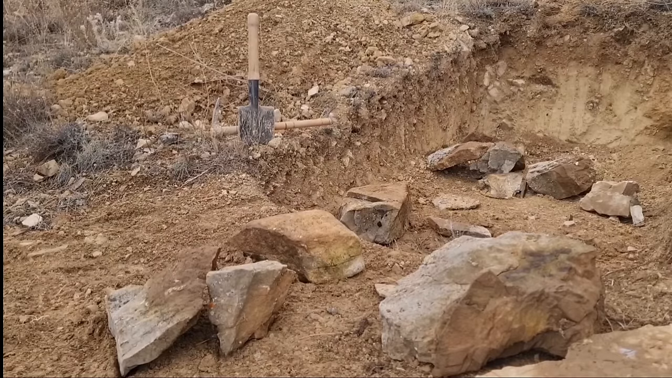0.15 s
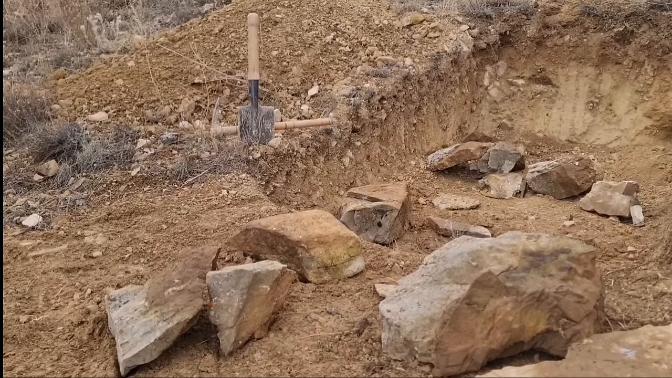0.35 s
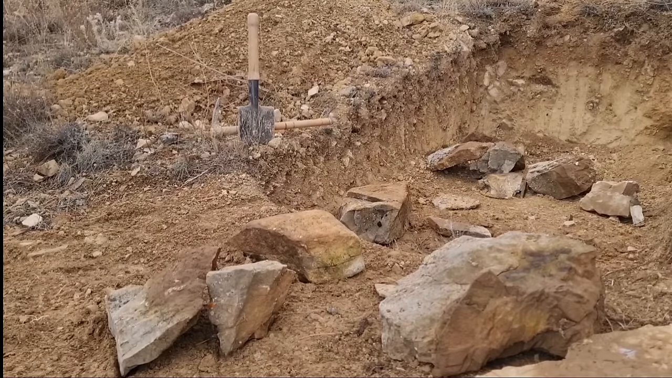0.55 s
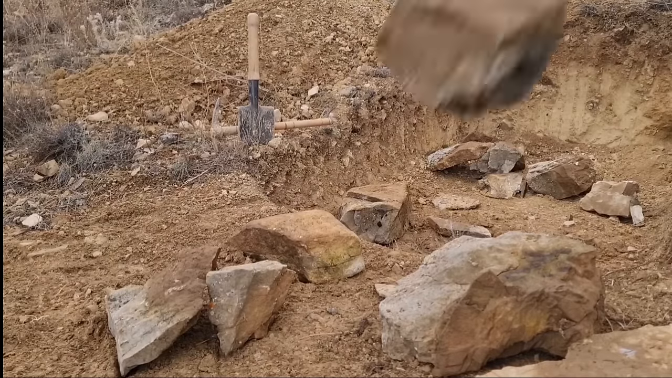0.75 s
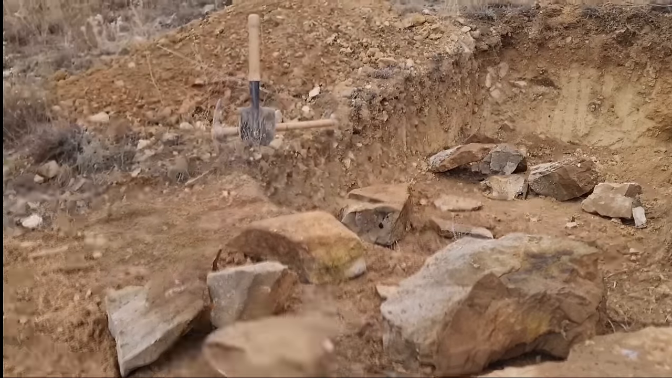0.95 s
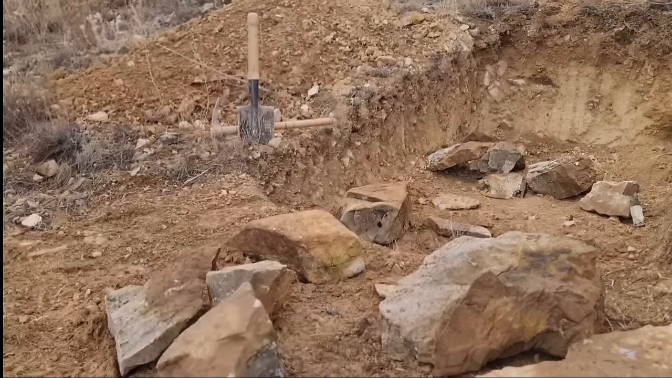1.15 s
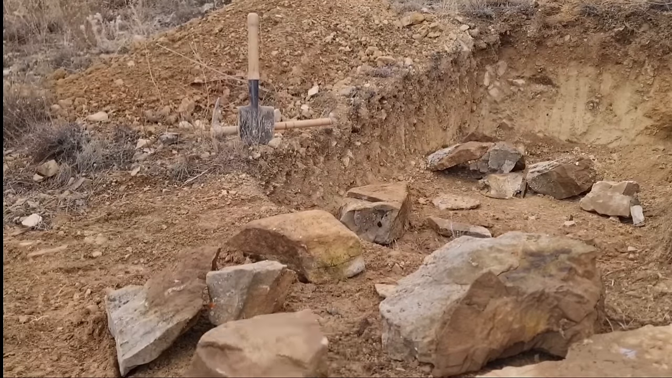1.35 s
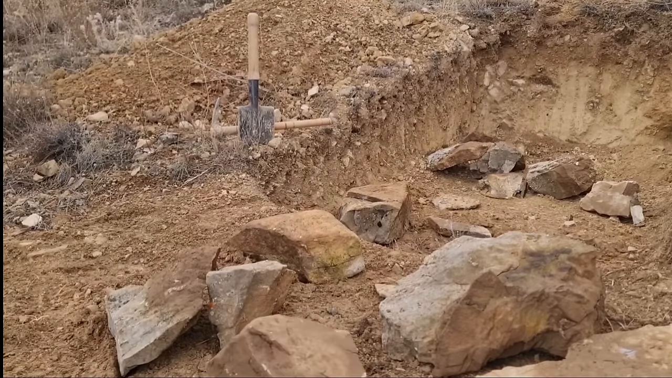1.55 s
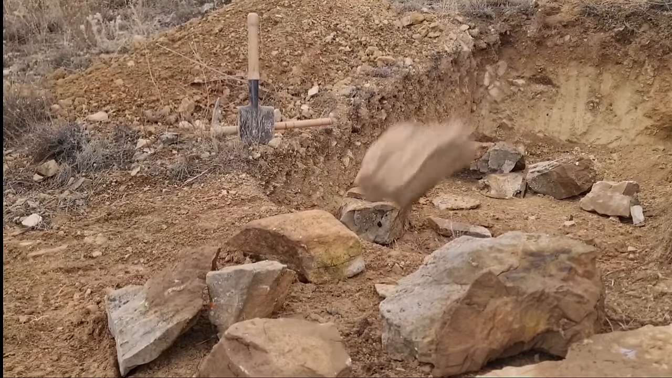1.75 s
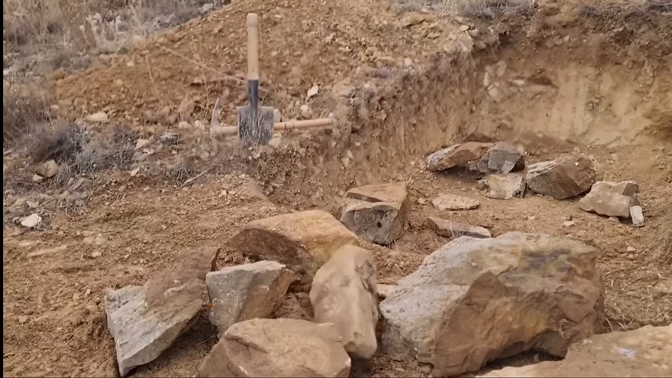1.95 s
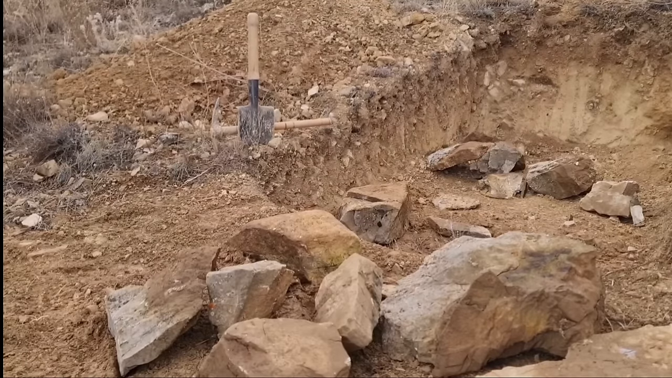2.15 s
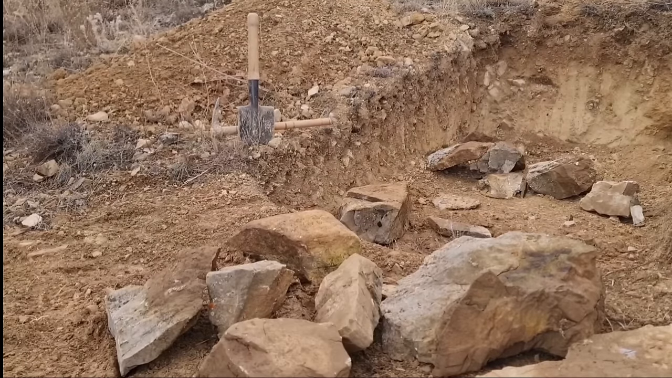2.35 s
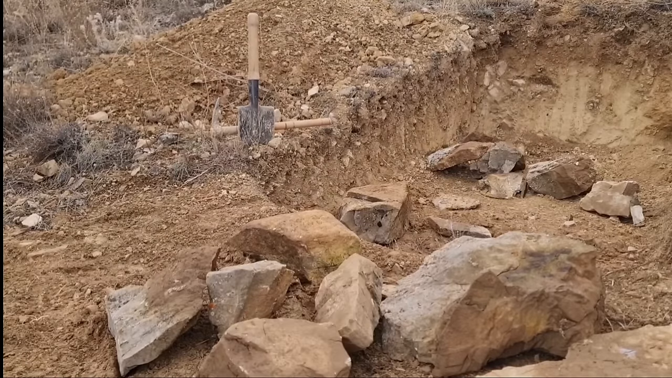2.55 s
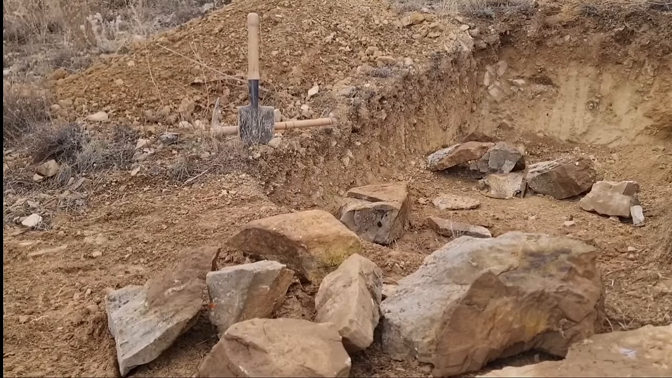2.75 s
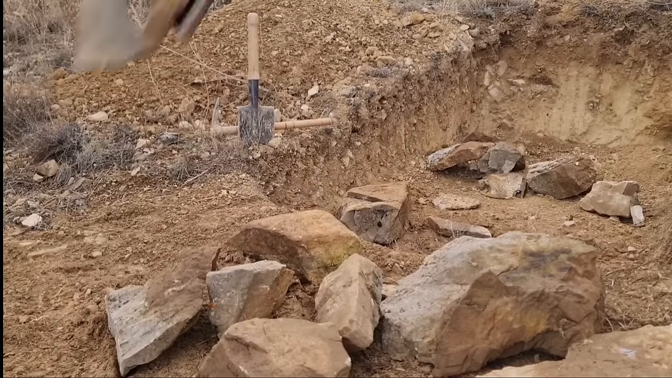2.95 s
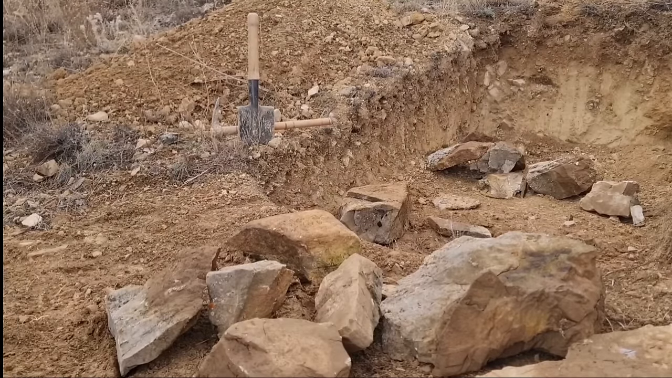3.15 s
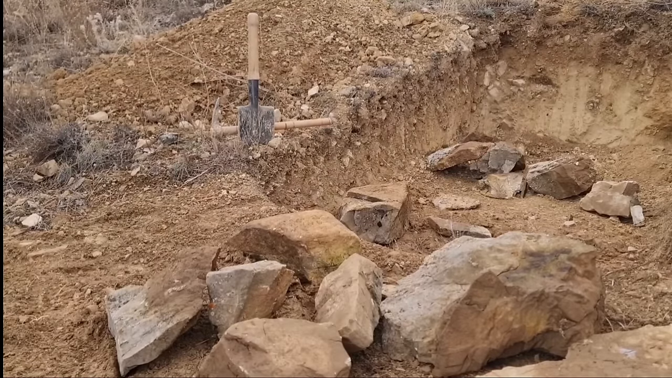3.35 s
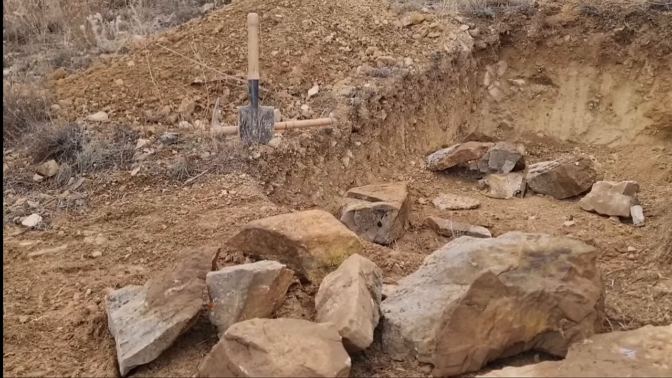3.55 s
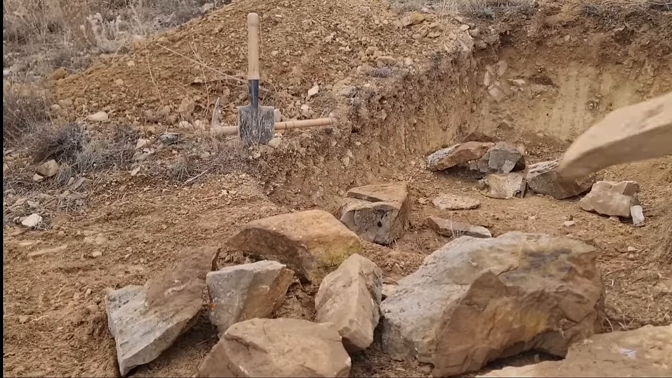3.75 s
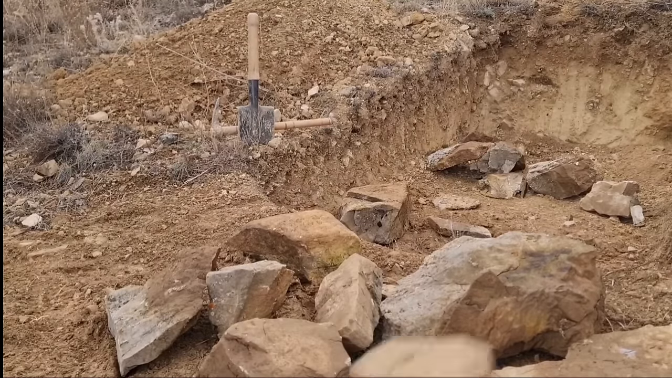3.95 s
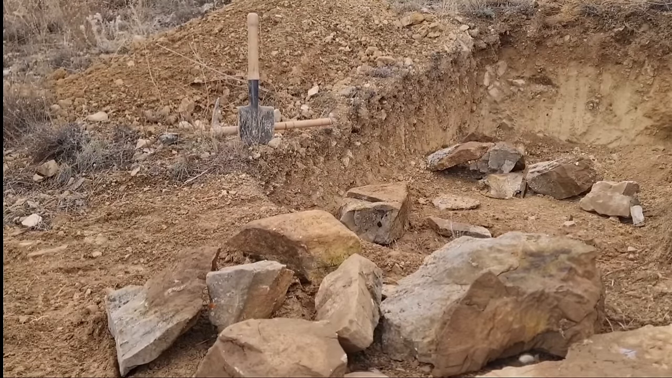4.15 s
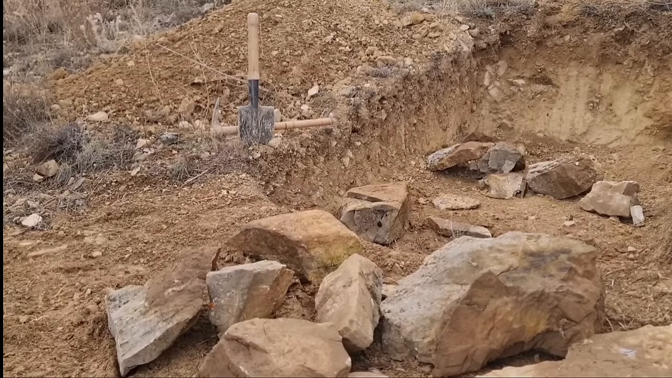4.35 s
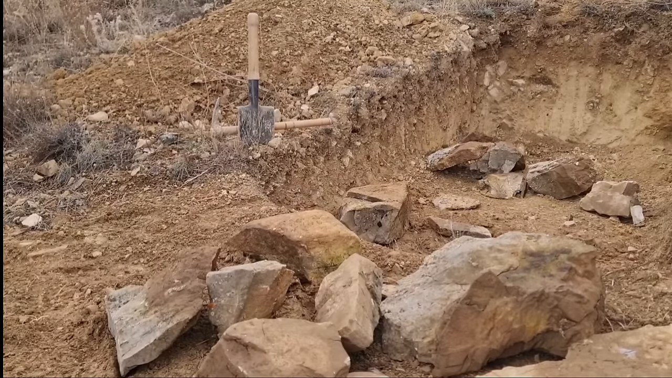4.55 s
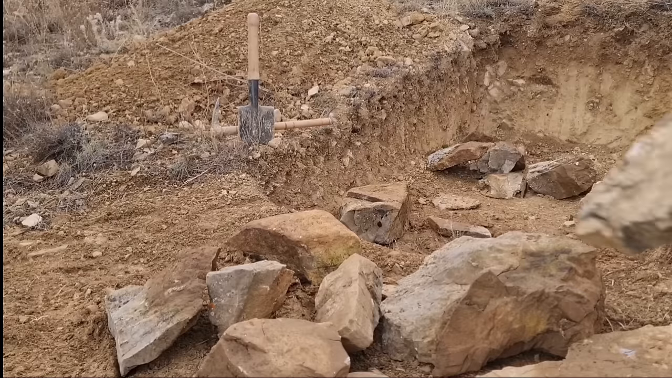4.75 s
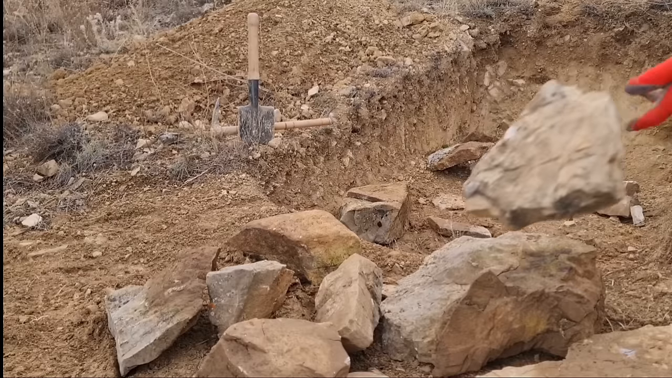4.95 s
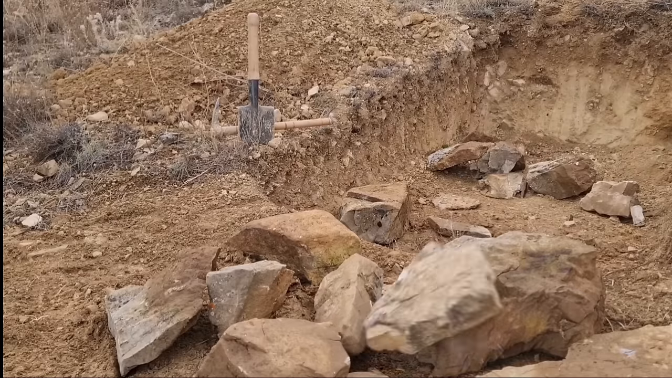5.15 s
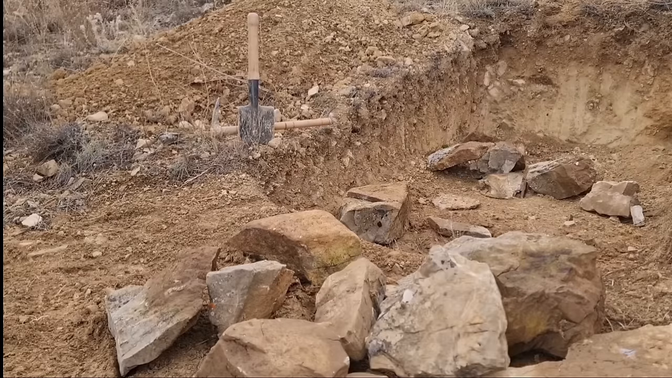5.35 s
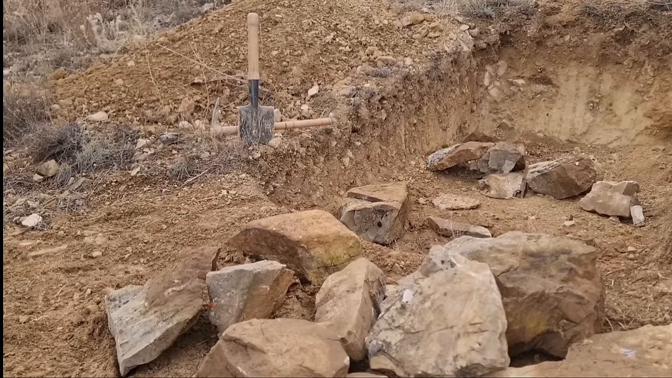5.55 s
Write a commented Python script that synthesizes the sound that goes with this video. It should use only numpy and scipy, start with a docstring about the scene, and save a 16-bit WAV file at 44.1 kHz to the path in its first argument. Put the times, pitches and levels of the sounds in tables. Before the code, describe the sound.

On a quiet hillside, rocks land with sharp cracks and dull earthy thumps; midway a metal tool clinks and drops in a rapid loud clatter.

```python
"""Heavy stones are tossed onto a pile on a dry, quiet hillside: pitched pulses with noise cracks, and
echoes off the rubble; grains of noise crush, damped low sines thud, and decaying sines ring on.
A steel tool, a bank of ringing modes, is touched lightly as it is taken up, then dropped.
A jacket of shaped noise swishes before the throws, over a low outdoor rumble, steady low air
and a faint wide background hiss whose level is turned down and up, probably by a noise suppressor."""
import sys
import numpy as np
from scipy import signal
from scipy.fft import rfft, irfft
from scipy.io import wavfile

SR = 44100
rng = np.random.default_rng(int(sys.argv[2]) if len(sys.argv) > 2 else 0)


def to_wav(s):
    """Save 16-bit WAV."""
    ch = np.atleast_2d(s).T  # columns
    pcm = np.round(np.clip(ch, -1, 1) * 32767)  # PCM
    wavfile.write(sys.argv[1], SR, pcm.astype(np.int16))


N = 246078
T = np.arange(N) / SR


def from_db(db):
    """Decibels to gain."""
    return 10 ** (np.asarray(db) / 20)


def rms_one(x):
    """Scale to unit rms."""
    return x / np.sqrt(np.mean(x ** 2) + 1e-20)


def unit_burst(x):
    """Scale a burst to unit rms over 3 ms."""
    return x / np.sqrt(np.sum(x ** 2) / (.003 * SR))


def colour(x, spectrum):
    """Shape x by a smooth curve of (Hz, dB) points."""
    hz, db = np.transpose(spectrum)
    size = x.shape[-1]
    bins = np.maximum(np.arange(size // 2 + 1) * SR / size, 1)
    gains = from_db(np.interp(np.log(bins), np.log(hz), db))
    return irfft(rfft(x) * gains, size)


def band(x, low_hz, high_hz, order=2):
    """Causal band-pass."""
    edges = [low_hz, np.clip(high_hz, 1.2 * low_hz, .45 * SR)]
    return signal.sosfilt(signal.butter(order, edges, "band", fs=SR, output="sos"), x)


def two_ears(noises, side_db):
    """A common signal plus a second one that enters the two ears with opposite signs."""
    return noises[0] + from_db(side_db) * noises[1] * np.array([[1], [-1]])


def stereo_noise(size, side_db):
    """White noise, partly shared by the ears."""
    return two_ears(rng.standard_normal((2, size)), side_db)


def swell(t, rise, decay):
    """Exponential rise to t = 0, then exponential decay."""
    return np.exp(np.minimum(t / rise, -t / decay))


def mode(hz, t60):
    """A unit sine dying away, after a soft start."""
    t = T[:SR // 4]
    fading = from_db(-60 * t / t60) * (1 - np.exp(-t / .0005))
    return fading * np.sin(2 * np.pi * hz * t)


def add(out, s, sound):
    """Mix a sound in from time s."""
    start = max(round(s * SR), 0)
    part = sound[..., :N - start]
    out[:, start:start + part.shape[-1]] += part


# Where the stones strike. Each row: in use from seconds, right ear later by ms, left minus right in dB,
# scatter off the rubble in dB, crushed grit against the crack in dB.
PLACES = [(0, 0.0056, 0.5, -12.5, -12), (1.7, 0.086, 0, -11.5, -1.5), (1.9, 0.051, -8, -9.5, 2.5),
          (2.5, 0.11, 0, -3.5, -21), (3.0, 0.34, -3, -11, -6.5), (3.26, 0.38, 5, -53.5, -37),
          (3.8, -0.037, -3.5, -15, -11.5), (4.9, -0.11, -7, -12, -1)]


def place_at(s):
    """Ear delay, balance, scatter and grit of the spot being struck."""
    return [row[1:] for row in PLACES if row[0] <= max(s, PLACES[0][0])][-1]


def placed(sound, s):
    """Each ear hears the spot with its own delay and level."""
    lag_ms, pan_db = place_at(s)[:2]
    gains = from_db([pan_db / 2, -pan_db / 2])
    shift = round(lag_ms * SR / 2000)  # half the lag for each ear, in samples
    left, right = np.broadcast_to(sound, (2, sound.shape[-1]))
    return rms_one(gains)[:, None] * np.array([np.roll(left, -shift), np.roll(right, shift)])


# Distant rumble. Each row: frequency in Hz, relative density in dB per Hz.
RUMBLE = [(5, -50), (20, -22.5), (40, -12.5), (60, -2.5), (73, -1.5), (100, -10.5), (150, -20), (300, -31),
          (1000, -68.5)]
# Low air and background hiss together. Each row: frequency in Hz, relative level in dB.
BACKGROUND = [(88, -29), (150, -4.5), (259, -9), (361, -5.5), (439, -6), (730, -5.5), (1140, -18),
              (1240, -10.5), (1720, -10.5), (3550, -15), (6260, -13), (9080, -27.5), (16000, -27)]
# Level of the background hiss, probably lowered and raised by a noise suppressor.
# Each row: time in seconds, level in dB (only its swing about the median counts).
HISS = [(0.03, -69.5), (0.3, -69.5), (0.78, -71.5), (1.1, -75), (1.58, -77.5), (1.65, -66.5), (2.02, -72),
        (2.13, -80.5), (2.26, -70), (2.75, -70.5), (3.36, -74.5), (4.5, -72.5), (4.76, -70), (4.94, -76),
        (5.19, -69.5), (5.54, -72.5)]
BACKGROUND_DB, RUMBLE_DB = -66, -60
HISS_FOLLOWS, HISS_FROM_HZ = 1.05, 570  # dB of hiss per dB of swing; below this pitch the air is steady


def hillside():
    """Low rumble, much alike in both ears, and steady low air under a faint wide hiss of varying level."""
    rumble = from_db(RUMBLE_DB) * rms_one(colour(stereo_noise(N, -11.5), RUMBLE))
    background = from_db(BACKGROUND_DB) * rms_one(colour(stereo_noise(N, 0.77), BACKGROUND))
    low_pass = signal.butter(2, HISS_FROM_HZ, fs=SR, output="sos")
    low_air = signal.sosfiltfilt(low_pass, background)
    hiss = background - low_air
    level_db = np.interp(T, *np.transpose(HISS))
    swing_db = HISS_FOLLOWS * (level_db - np.median(level_db))
    return rumble + low_air + from_db(swing_db) * hiss


# Jacket strokes. Each row: peak in seconds, level in dB, rise in seconds.
SWISHES = [(0.484, -46.5, 0.044), (1.765, -62, 0.036), (2.666, -39.5, 0.049), (3.03, -54.5, 0.18),
           (3.616, -49, 0.058), (4.856, -54, 0.035)]
# Rub of the fabric. Each row: frequency in Hz, relative density in dB per Hz.
CLOTH = [(200, -8), (800, -5.5), (1800, -7), (3200, 1.5), (4500, -3), (6300, 5), (9000, -7), (12000, -3),
         (16000, -9.5)]
SWISH_DECAY_SHARE = 0.54  # of the rise time
SWISH_ROUNDNESS = 1.7  # 1 is a pointed stroke, 2 a bell


def jacket():
    """Smooth fabric slides on itself as the arms speed up and stop."""
    power = 1e-18
    for s, db, rise in SWISHES:
        away = np.maximum((s - T) / rise, (T - s) / (SWISH_DECAY_SHARE * rise))
        fall = np.minimum(np.abs(away) ** SWISH_ROUNDNESS, 20)
        power = power + from_db(db) ** 2 * np.exp(-2 * fall)
    return np.sqrt(power) * rms_one(colour(stereo_noise(N, 0.4), CLOTH))


# Light touches as the steel tool is taken up. Each row: start in seconds, level in dB.
CLINKS = [(2.612, -48.5), (2.768, -56), (2.809, -53.5), (2.842, -48), (2.879, -35.5), (2.899, -40.5)]
TOUCH_HZ, TOUCH_DB_PER_OCTAVE = 1590, 47  # the lightest touch favours this pitch, firmer ones higher modes
# In its fall every knock strikes the steel, favouring modes this far above the knock's pitch.
TOOL_FALLS_S, TOOL_RESTS_S = 3.08, 3.268
FALL_RATIO, FALL_DB = 3.6, -30
FALL_FOLLOWS = .5  # dB of ring per dB of knock


def tool_strikes():
    """Light touches as the tool is lifted, then the knocks of its fall: rows (s, dB, favoured Hz)."""
    lightest_db = min(db for _, db in CLINKS)
    rows = []
    for s, db in CLINKS:
        octaves_up = (db - lightest_db) / TOUCH_DB_PER_OCTAVE
        rows.append((s, db, TOUCH_HZ * 2 ** octaves_up))
    for s, db, hz, _ in KNOCKS:
        if TOOL_FALLS_S < s < TOOL_RESTS_S:
            rows.append((s, FALL_DB + FALL_FOLLOWS * db, FALL_RATIO * hz))
    return rows


# The tool's modes. Each row: frequency in Hz, relative level in dB, t60 in seconds.
STEEL = [(1620, 0, .1), (1885, -1, .035), (2260, -9, .04), (2976, -5, .13), (3100, -2, .13),
         (3327, -2, .15), (3485, 0, .14), (3630, -5, .08), (3970, -6, .09), (5520, -8, .07),
         (6050, -5, .08), (6430, -2, .08), (6725, -1, .1)]


def tool(width_octaves=.4, uneven_db=3.0, damped_s=.002):
    """Each strike sounds the modes near its favoured pitch; the last blow pins the steel and silences it."""
    out = np.zeros((2, N))
    hz, mode_db, t60 = np.transpose(STEEL)
    shapes = mode(hz[:, None], t60[:, None])
    for s, db, favoured_hz in tool_strikes():
        reach = np.exp(-(np.log2(hz / favoured_hz) / width_octaves) ** 2)
        levels_db = db + mode_db + uneven_db * rng.standard_normal(len(hz))
        strengths = from_db(levels_db) * reach * rng.choice([-1, 1], len(hz))
        add(out, s, placed(strengths @ shapes, s))
    return out * np.exp(-np.clip((T - TOOL_RESTS_S) / damped_s, 0, 20))


# Modes of four stones. Each row: stone in play from seconds, frequency in Hz,
# level against the knock in dB, t60 in seconds.
STONE_MODES = [(.8, 247, -4, 0.018), (.8, 360.3, -10, 0.027), (1.7, 327, -21, .05), (1.7, 531, -22, .055),
               (1.7, 724, -18.5, .045), (3.9, 400, -15.5, 0.032), (3.9, 3490, -27.5, 0.05),
               (3.9, 6470, -36.5, 0.051), (5.0, 613, -12.5, 0.056), (5.0, 1154, -12, 0.02),
               (5.0, 2775, -32.5, 0.083), (5.0, 4380, -26.5, 0.024)]
SETTLE_S = 0.3  # time a stone takes to come to rest
RING_CEILING_DB = -12.5  # harder blows press the stone into the heap and ring no louder


def rings():
    """Until it has settled, a loosely supported stone rings briefly in its own modes at every knock."""
    out = np.zeros((2, N))
    for s, db, _, _ in KNOCKS:
        for thrown_s, hz, mode_db, t60 in STONE_MODES:
            if thrown_s <= s < thrown_s + SETTLE_S:
                ring = from_db(min(db, RING_CEILING_DB) + mode_db) * mode(hz, t60)
                add(out, s, placed(ring, s))
    return out


# A stone or the tool drags over grit. Each row: peak in seconds, level in dB, decay in seconds.
SLIDES = [(.92, -40, 0.022), (.985, -48, .021), (1.803, -50, 0.018), (3.112, -29.5, 0.027),
          (3.192, -23, 0.02), (3.94, -31, 0.013), (5.053, -21.5, 0.005), (5.105, -35, 0.012),
          (5.275, -61, 0.045)]
# Spectrum of the grains. Each row: frequency in Hz, relative density in dB per Hz.
GRIT = [(150, -15.5), (350, 4), (650, -3.5), (1300, -1), (2200, -3), (3300, -7.5), (6500, -9), (9000, -6.5),
        (16000, -8.5)]
SLIDE_RISE_SHARE, SLIDE_TOP_HZ = 0.57, 5800  # rise as a share of the decay
CRUSH_RISE_S, CRUSH_DECAY_S, CRUSH_TOP_HZ = 0.0019, 0.0069, 6800  # grit under a knock


def grinding(grains_per_s=9000, size_db=5.0):
    """Grains burst at random under each knock and slide, a few large ones among many small."""
    out = np.zeros((2, N))
    t = T[:SR // 4] - .1
    shape = (2, len(t))
    events = []
    for s, _, _, crack_db in KNOCKS:
        events.append((s, crack_db + place_at(s)[3], CRUSH_RISE_S, CRUSH_DECAY_S, CRUSH_TOP_HZ))
    for s, db, decay in SLIDES:
        events.append((s, db, SLIDE_RISE_SHARE * decay, decay, SLIDE_TOP_HZ))
    for s, db, rise, decay, top_hz in events:
        sizes = from_db(size_db * np.minimum(rng.exponential(1, shape), 4))
        signed_sizes = sizes * rng.choice([-1, 1], shape)
        bursting = rng.random(shape) < grains_per_s / SR
        grains = two_ears(signed_sizes * bursting, -3.5)
        crunch = rms_one(band(colour(grains, GRIT), 170, top_hz))
        add(out, s + t[0], placed(from_db(db) * crunch * swell(t, rise, decay), s))
    return out


# Soil taking the weight. Each row: start in seconds, level in dB, frequency in Hz.
THUDS = [(0.872, -8, 87), (.94, -33.5, 54.9), (0.986, -25.5, 72.03), (1.02, -35, 60.04),
         (1.125, -44, 52.26), (1.309, -34.5, 58), (1.799, -18, 67.3), (1.956, -30, 108),
         (3.085, -23.5, 100), (3.129, -28.5, 63.8), (3.95, -25, 145), (3.96, -15, 72.35),
         (4.051, -28.5, 67.5), (5.036, -30, 79.2), (5.085, -22.5, 90.4), (5.14, -33, 79.4)]
THUD_CYCLES = .38  # decay time, in periods
REBOUND_S, REBOUND_DB, REBOUND_PITCH = .028, -10.5, .66  # the stone drops back once, lower and weaker


def thuds(side_db=-15):
    """The stone's mass bounces on the springy soil, heavily damped; the ears catch it a little out of step."""
    out, t = np.zeros((2, N)), T[:SR // 4]
    rebounds = [(s + REBOUND_S, db + REBOUND_DB, hz * REBOUND_PITCH) for s, db, hz in THUDS]
    for s, db, hz in THUDS + rebounds:
        phase, age = 2 * np.pi * hz * t, t * hz / THUD_CYCLES
        envelope = from_db(db) * age * np.exp(1 - age)
        add(out, s, envelope * two_ears([np.sin(phase), np.cos(phase)], side_db))
    return out * from_db([[-.5], [.5]])  # slightly to the right


# Sound scattered by the rubble. Each row: frequency in Hz, relative level in dB.
RUBBLE = [(100, -6.5), (300, 6), (600, -1), (1200, -8), (3000, -0.5), (7000, -4.5), (16000, -1.5)]
# Resonances of the heap and its hollows. Each row: frequency in Hz, relative level in dB.
HEAP = [(410, -3.5), (512, -0.5), (585, 0), (631, -0.5), (825, -1), (968, -3), (1192, -1), (1310, -2.5),
        (1568, -3), (1912, -5), (2275, -4)]


def scatter(sound, near_s=.008, far_s=0.068, far_db=-36, spray_db=1.0, heap_db=-10, heap_t60=0.028):
    """Nearby stones throw back a dense, short spray and resonate; the bank adds a faint longer tail."""
    t = T[:SR // 4]
    tails = np.exp(-t / near_s) + from_db(far_db) * np.exp(-t / far_s)
    fading = tails * (1 - np.exp(-t / .0008))
    spray = colour(stereo_noise(len(t), 0), RUBBLE) * fading
    heap = sum(from_db(db) * rng.choice([-1, 1]) * mode(hz, heap_t60) for hz, db in HEAP)
    # both parts are brought to unit energy per ear before their levels are set
    spray = from_db(spray_db) * spray / np.sqrt(np.sum(spray ** 2) / 2)
    heap = from_db(heap_db) * heap / np.sqrt(np.sum(heap ** 2))
    return signal.fftconvolve(sound[None], spray + heap, axes=-1)


# Tiny chips break off. Each row: start in seconds, level in dB, lowest pitch in Hz.
SNAPS = [(0.6743, -55, 4000), (1.3, -48, 1500), (4.2167, -40.5, 5540), (4.362, -46, 5000),
         (5.3284, -57.5, 3000)]
SNAP_TOP_HZ, SNAP_DECAY_S = 13600, 0.0028


def snaps(scatter_db=-12):
    """A chip breaks with a thin bright tick and no body."""
    out, t = np.zeros((2, N)), T[:SR // 40]
    for s, db, low_hz in SNAPS:
        burst = stereo_noise(len(t), -2) * np.exp(-t / SNAP_DECAY_S)
        tick = from_db(db) * unit_burst(band(burst, low_hz, SNAP_TOP_HZ))
        add(out, s, placed(tick, s))
        add(out, s, from_db(scatter_db) * placed(scatter(tick.mean(0)), s))
    return out


# Knocks on stone. Each row: time in seconds, knock level in dB, knock pitch in Hz, crack level in dB.
KNOCKS = [(0.8704, -1, 845, -22), (0.8953, -4, 680, -11), (0.905, -1.5, 1550, -23.5),
          (1.435, -51, 1900, -63.5), (1.5446, -46.5, 1500, -71.5), (1.7915, -12.5, 1110, -21),
          (1.795, -9.5, 786, -37), (1.9604, -14.5, 570, -46.5), (2.088, -30, 1150, -72),
          (2.1465, -49.5, 506, -84), (2.8805, -31, 1930, -50.5), (2.9, -31.5, 1850, -50.5),
          (3.0896, -17.5, 1700, -14), (3.0993, 0.5, 990, -21.5), (3.1036, -5, 1490, -11.5),
          (3.1299, -21, 2760, -25), (3.1474, -11, 2580, -25.5), (3.1531, -7.5, 2320, -22.5),
          (3.1576, -1, 924, -26), (3.1788, -2, 870, -20), (3.1855, 3, 1100, -14.5),
          (3.199, -14, 1110, -15.5), (3.2088, -13, 700, -38.5), (3.228, -12.5, 1220, -29),
          (3.2679, -5.5, 1057, -18.5), (3.269, -2, 2340, -21.5), (3.9194, -7.5, 3050, -15.5),
          (3.9404, -1.5, 780, -12.5), (3.945, -8.5, 2240, -19), (3.949, 2.5, 902, -31),
          (4.0539, -21.5, 688, -45.5), (5.037, -16.5, 1150, -23), (5.0793, -5.5, 1780, -28.5),
          (5.081, -3, 577, -30.5), (5.098, -7.5, 636, -22), (5.1144, -14.5, 595, -44),
          (5.2318, -28, 696, -52.5), (5.258, -29, 1140, -42)]
# Small chips tick down after a landing. Each row: start in seconds, level at the start in dB.
SETTLING = [(1.0, -47), (1.85, -45), (4.0, -64.5), (5.3, -46.5)]
TICKS_PER_S, TICK_FADE_DB_PER_S = 9, 43
TICK_HZ, TICK_CRACK_DB = 1270, -33  # middle pitch, an octave either way; crack against the tick
# One weaker touch follows each knock as the loose rubble gives; the spot's scatter level adds to its drop.
CHATTER_S, CHATTER_DB = .0085, -9.5


def contacts():
    """Every knock with its chatter, then the settling ticks: rows (s, dB, pitch Hz, crack dB)."""
    rows = list(KNOCKS)
    for (s, db, hz, crack_db), late in zip(KNOCKS, rng.uniform(.8, 1.2, len(KNOCKS))):
        loss_db = CHATTER_DB + place_at(s)[2]
        rows.append((s + CHATTER_S * late, db + loss_db, hz, crack_db + loss_db))
    for s, db in SETTLING:
        for when, pitch in rng.random((round(TICKS_PER_S * SETTLE_S), 2)):
            delay = SETTLE_S * when
            tick_db = db - TICK_FADE_DB_PER_S * delay
            rows.append((s + delay, tick_db, TICK_HZ * 2 ** (2 * pitch - 1), tick_db + TICK_CRACK_DB))
    return [row for row in rows if row[0] < T[-1]]


def pulse(t, hz, cycles):
    """A few cycles of pressure; a softer contact lasts longer and sounds lower."""
    age = np.maximum(t * hz / cycles + 2, 0)
    return (age / 2) ** 2 * np.exp(2 - age) * np.sin(2 * np.pi * hz * t)


def splinters(chips, crack_db, splinter_db=-13, growth=1.8, usual_db=-19.0):
    """The hardest contacts also split grains with a very bright snap, which grows faster than the blow."""
    snap = band(chips, 8000, 15000)
    level_db = splinter_db + usual_db + growth * (crack_db - usual_db)
    return from_db(level_db) * unit_burst(snap)


# The hard edge touches first, with an overtone midway in level between knock and crack.
OVERTONE_RATIO, OVERTONE_DB, OVERTONE_LEAD_S = 2.8, -1, .0008


def knocks(cycles=0.26, crack_gain_db=1, crack_s=0.00077, crack_low_hz=2500, crack_top_hz=5800,
           crack_follows=0.75, usual_hz=1000):
    """A stone stopped dead pushes out a short pulse; its crumbling contact point cracks."""
    out, lead = np.zeros((2, N)), SR // 200
    t = T[:SR // 40] - lead / SR
    for s, db, hz, crack_db in contacts():
        body = from_db(db) * pulse(t, hz, cycles)
        overtone_db = (db + crack_db) / 2 + OVERTONE_DB
        overtone = from_db(overtone_db) * pulse(t + OVERTONE_LEAD_S, OVERTONE_RATIO * hz, cycles)
        chips = stereo_noise(len(t), -6.0) * swell(t + 0.00021, 0.00012, crack_s)
        top_hz = crack_top_hz * (hz / usual_hz) ** crack_follows  # higher knocks crack brighter
        crack = from_db(crack_db + crack_gain_db) * unit_burst(band(chips, crack_low_hz, top_hz))
        hit = body + overtone + crack + splinters(chips, crack_db)
        add(out, s + t[0], placed(hit, s))
        echoes = placed(scatter(hit.mean(0)), s)
        add(out, s + t[0], from_db(place_at(s)[2]) * echoes)
    return out


# Tone of the microphone on the close sounds. Each row: frequency in Hz, level in dB.
MICROPHONE = [(20, 0.5), (820, -1), (1030, -4), (1250, 1.5), (6800, -0.5), (8000, -4), (9500, -9),
              (11000, -4), (13000, -3), (16000, -5)]


def scene():
    """Stones, tool and jacket close by, coloured by the microphone, over the open hillside."""
    stones = knocks() + snaps() + thuds() + grinding() + rings()
    close = stones + tool() + jacket()
    return colour(close, MICROPHONE) + hillside()


CUTOFF_HZ = 16900


def record(dry):
    """The hardest knocks are rounded off near full scale; the top is cut."""
    rounded = dry / (1 + (dry / .86) ** 6) ** (1 / 6)
    top_cut = signal.cheby2(18, 70, CUTOFF_HZ, fs=SR, output="sos")
    return signal.sosfilt(top_cut, rounded)


dry = scene()
out = record(dry)
to_wav(out)
```